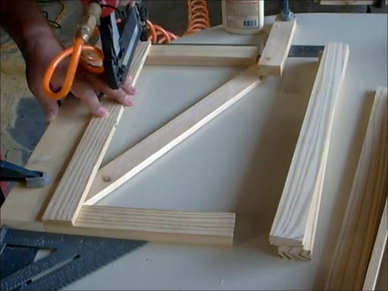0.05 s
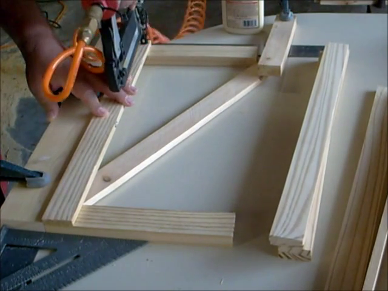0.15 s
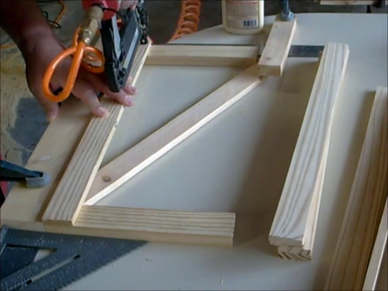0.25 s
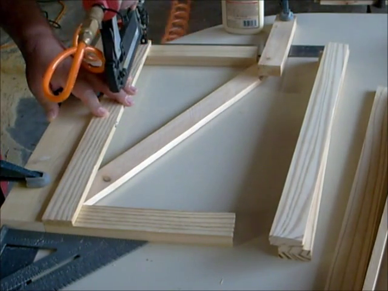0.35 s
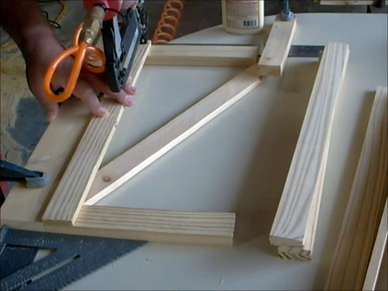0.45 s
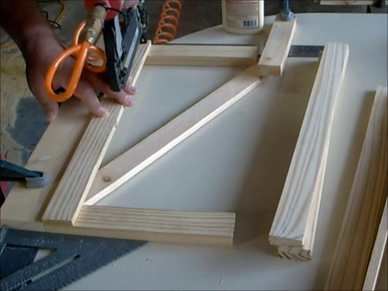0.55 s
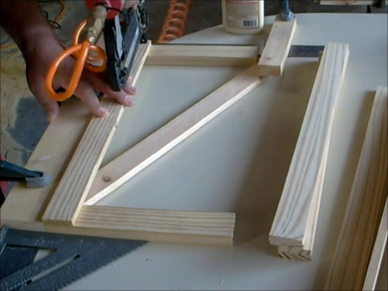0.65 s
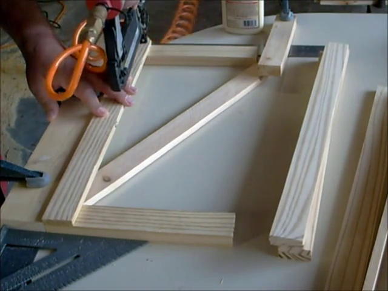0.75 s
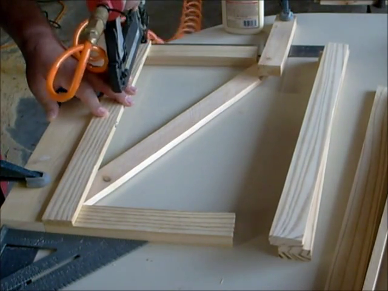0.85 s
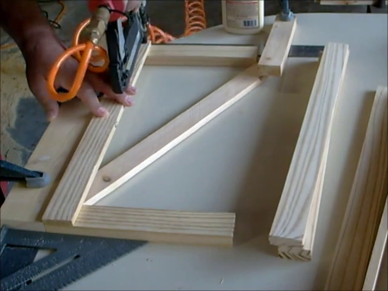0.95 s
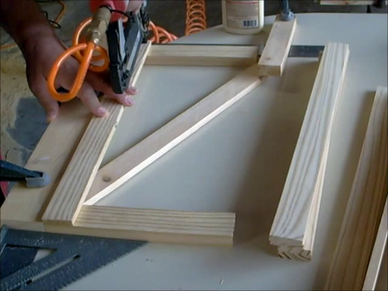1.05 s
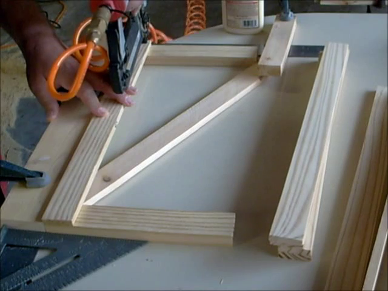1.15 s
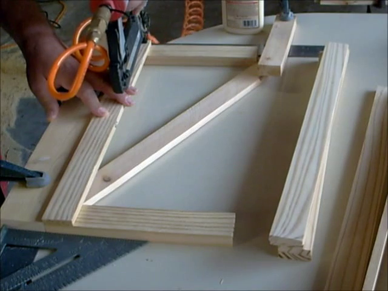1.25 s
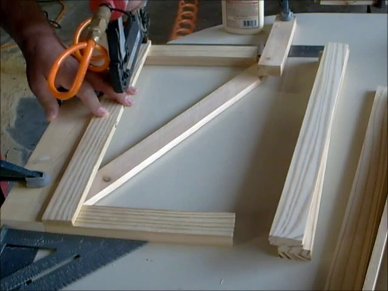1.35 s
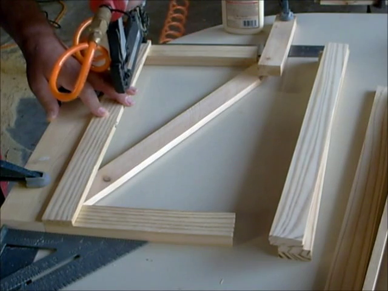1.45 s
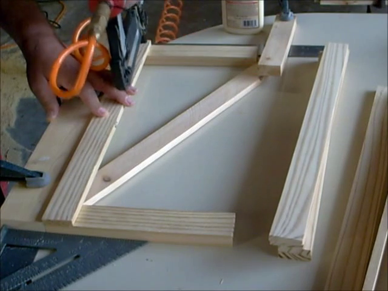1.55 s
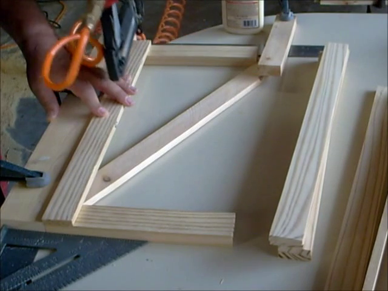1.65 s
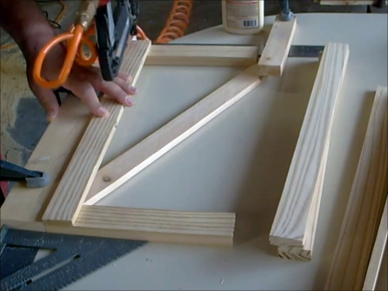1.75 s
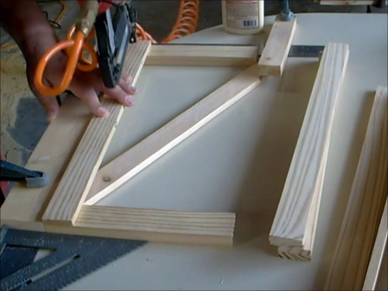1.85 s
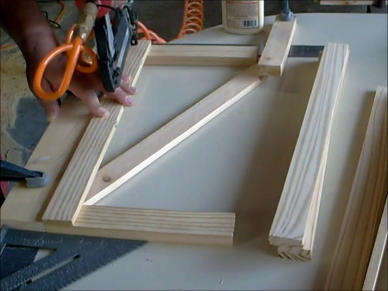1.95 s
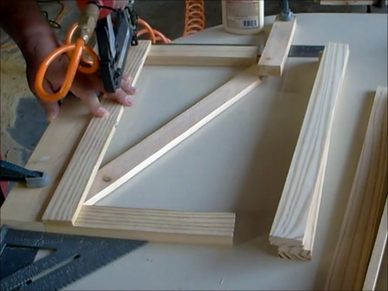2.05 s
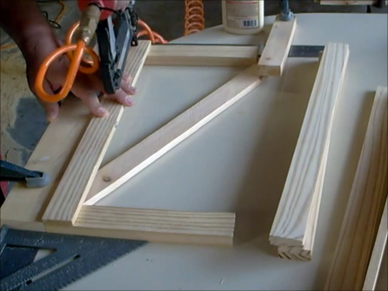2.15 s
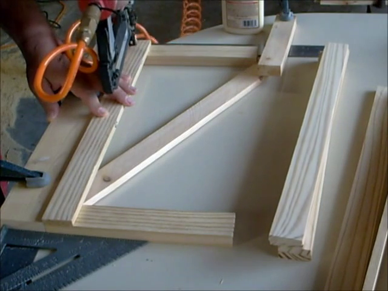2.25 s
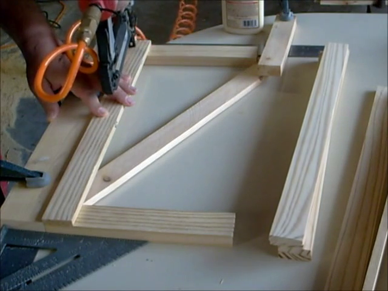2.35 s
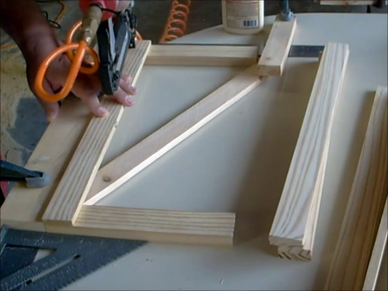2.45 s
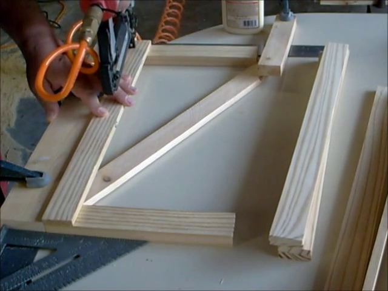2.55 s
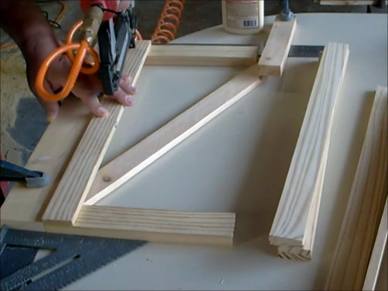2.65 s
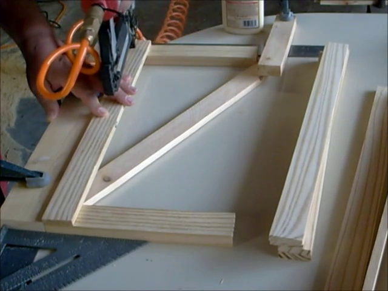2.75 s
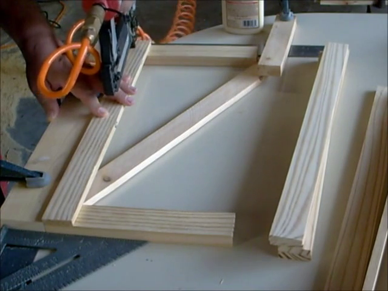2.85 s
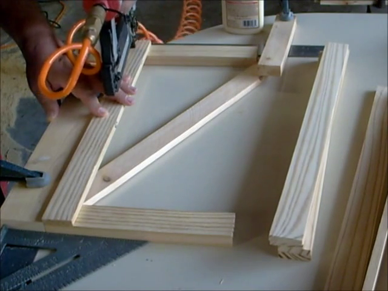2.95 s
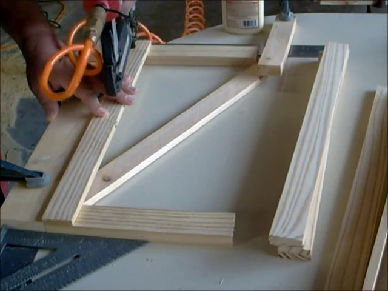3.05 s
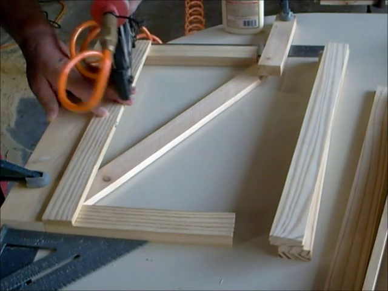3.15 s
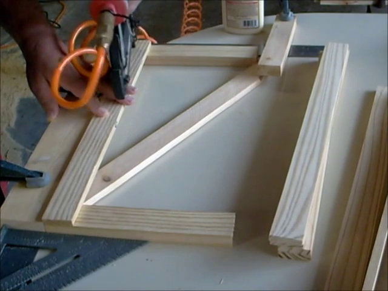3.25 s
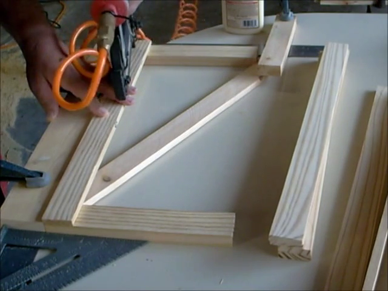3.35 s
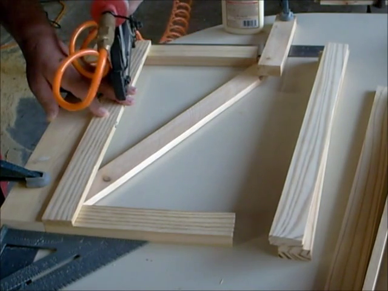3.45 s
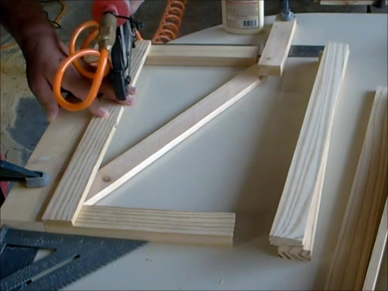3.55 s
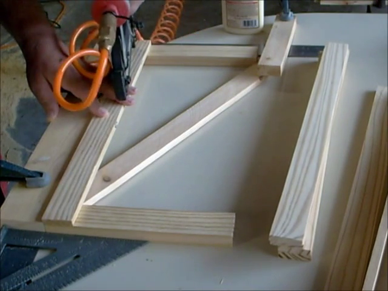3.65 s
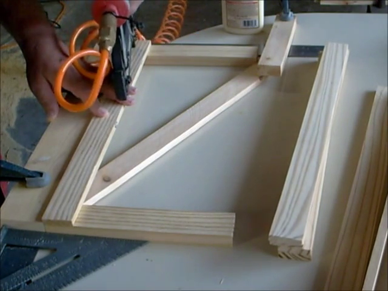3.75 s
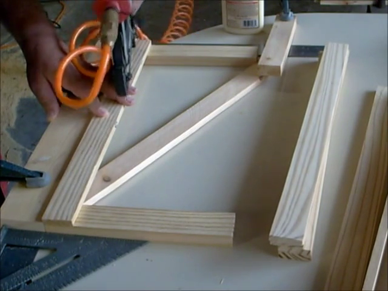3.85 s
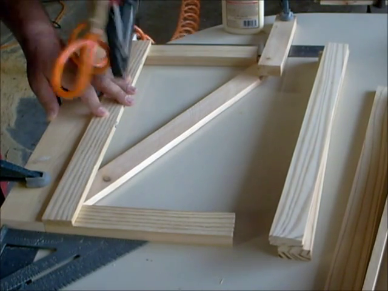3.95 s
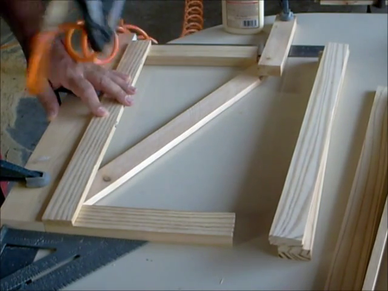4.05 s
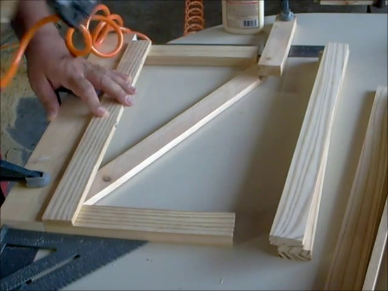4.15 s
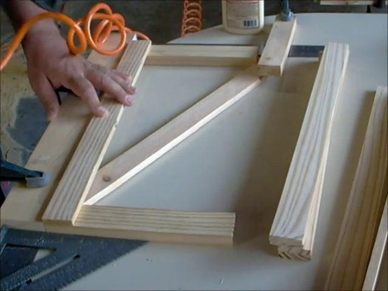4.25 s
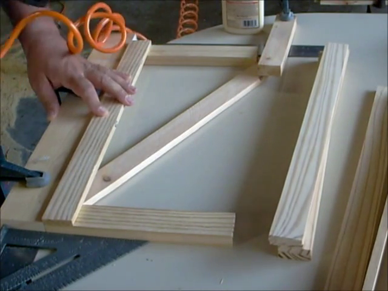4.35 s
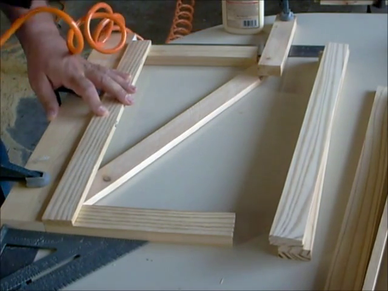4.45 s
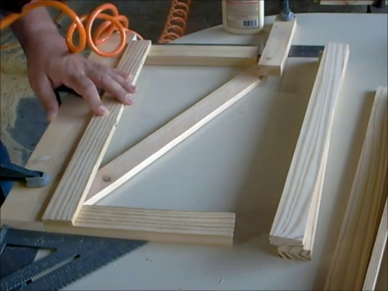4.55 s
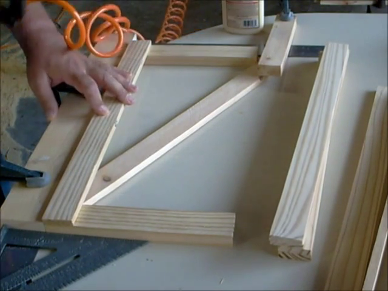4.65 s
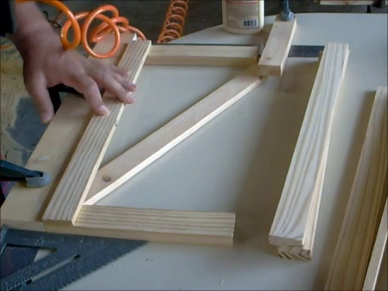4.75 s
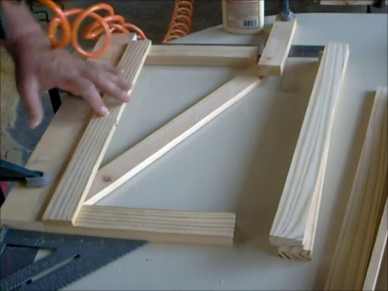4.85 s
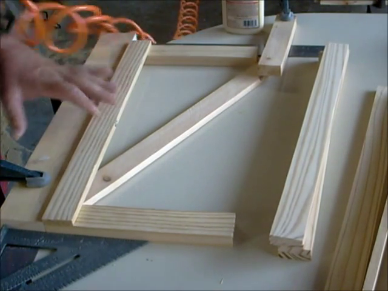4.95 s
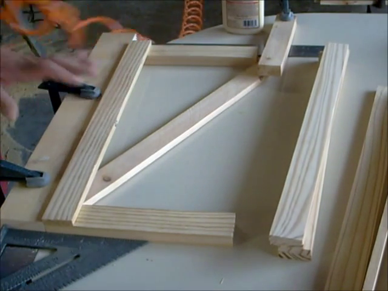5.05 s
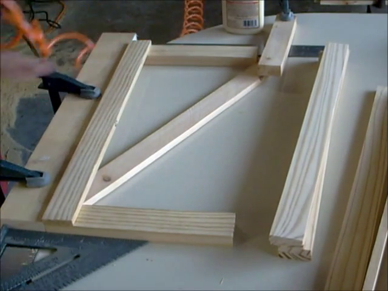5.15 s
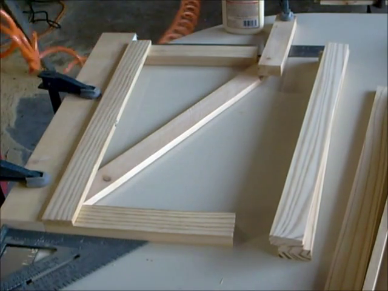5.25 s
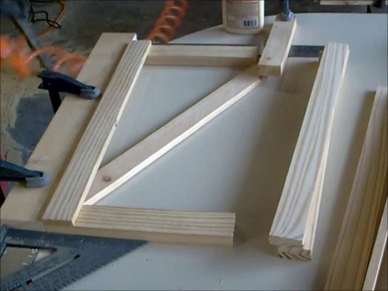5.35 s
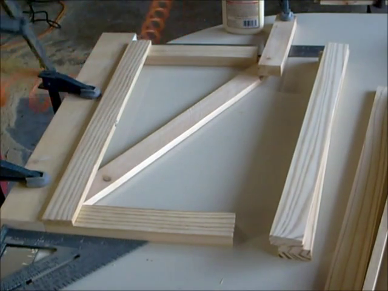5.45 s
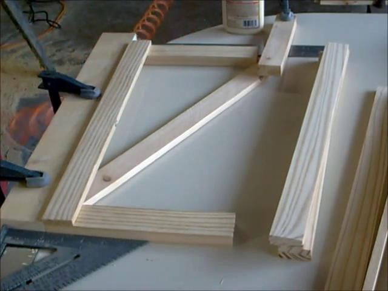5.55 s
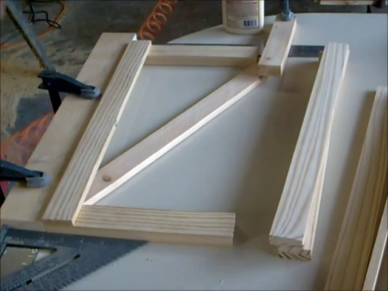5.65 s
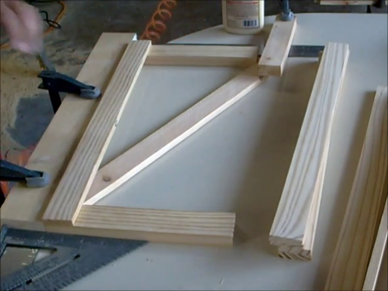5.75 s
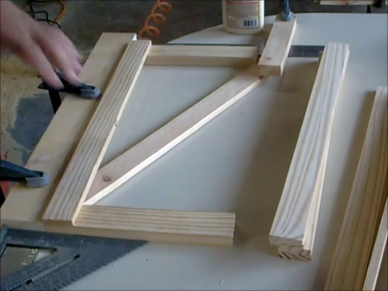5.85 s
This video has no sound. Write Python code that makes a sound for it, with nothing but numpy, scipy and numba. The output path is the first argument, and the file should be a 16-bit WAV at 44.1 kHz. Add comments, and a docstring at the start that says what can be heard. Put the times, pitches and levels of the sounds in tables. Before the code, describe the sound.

A small microphone near a bench picks up faint traffic and a few dry wooden clicks. Two separate air nailer shots burst out, each a brief hiss, hard bang, crackling distorted ring near three kilohertz, and air release with a second knock. Room echoes die away, then soft scraping and a tap follow as a vehicle passes far off.

```python
"""Air nailer in a workshop

Two brads go into wooden slats on a bench in a hard-walled room, near a small camera microphone.
Each shot: valve hiss, blow, exhaust puff, piston return, then band-by-band room echoes of shaped noise.
Taps (sine clicks, noise knocks), a grainy scrape and distant traffic (noise with drifting humps) surround them.
The microphone peaks near 3 kHz, its limiter holds the ringing level, and overloads fold over into clicks.
"""
import sys
import numpy as np
from scipy import signal
from scipy.fft import rfft, irfft
from scipy.io import wavfile
from scipy.ndimage import uniform_filter1d
from numba import njit

SR = 44100
rng = np.random.default_rng(int(sys.argv[2]) if len(sys.argv) > 2 else 0)


def dump(signal):
    """Clip the signal to [-1, 1] and save it as 16-bit WAV at the path in sys.argv[1]."""
    limited = np.clip(np.atleast_2d(signal).T, -1, 1)
    pcm = np.round(limited * 32767).astype(np.int16)
    wavfile.write(sys.argv[1], SR, pcm)


def makeup_ratio(level_db):
    """Linear amplitude ratio for a level in decibels (20 dB per factor of ten)."""
    decades = np.asarray(level_db, float) / 20
    return 10 ** decades


N = 260172
T = np.arange(N) / SR


def level(x, rms_db):
    """Scale to an rms level."""
    return x * makeup_ratio(rms_db) / np.sqrt(np.mean(x ** 2))


def colour(x, points):
    """Minimum-phase filter through (Hz, dB) points, from the folded cepstrum of the log gain."""
    hz, db = np.transpose(points)
    size = 4096
    bins_hz = np.fft.rfftfreq(size, 1 / SR)
    gain_db = np.interp(np.log(bins_hz + 1), np.log(hz), db)
    cepstrum = irfft(np.log(makeup_ratio(gain_db)))
    cepstrum[1:size // 2] *= 2
    cepstrum[size // 2 + 1:] = 0
    impulse = irfft(np.exp(rfft(cepstrum)))
    return signal.fftconvolve(x, impulse)[:len(x)]


def band(x, hz, width_hz):
    """Resonance, gain 1 at the centre."""
    return signal.lfilter(*signal.iirpeak(hz, hz / width_hz, fs=SR), x)


def burst(start_s, t60_s, rise_s=0.00035):
    """Envelope that rises exponentially at start_s and dies away by 60 dB in t60_s."""
    t = np.maximum(T - start_s, 0)
    return (1 - np.exp(-t / rise_s)) * np.exp(-np.log(1000) * t / t60_s)


# distant vehicle drawing near and leaving: time_s, level_db, lower_hump_hz
TRAFFIC_PATH = [(0, -56.5, 793.6), (.9, -55, 782), (2.3, -53.5, 771.6), (3.2, -51.5, 766),
                (4.3, -46, 725.5), (4.65, -45.5, 675), (4.9, -49, 672), (5.3, -50, 701.5), (5.9, -52, 713)]
# rumble spectrum: freq_hz, density_db (dB per Hz)
RUMBLE_SPECTRUM = [(30, -24), (100, -4.5), (250, 2), (500, 0), (1000, 3), (1600, -1.5), (2400, -8),
                   (4000, -39.5)]
# humps grow with the level; the treble follows only in part (growth: dB per dB above MIDDLE_DB)
MIDDLE_DB = -53.5
HUMP_DB, HUMP_GROWTH = -3.5, 0.73
TREBLE_DB, TREBLE_GROWTH = -61.5, 0.3


def traffic():
    """Broad rumble with two humps that drift together, and a fainter treble."""
    columns = np.transpose(TRAFFIC_PATH)
    _, level_db, hump_hz = (np.interp(T, columns[0], column) for column in columns)
    noise = rng.standard_normal((4, N))
    # narrow noise shifted up to the moving centres
    phase = 2 * np.pi * np.cumsum(hump_hz) / SR
    lower = level(signal.lfilter([1], [1, -0.99], noise[1]) * np.cos(phase), 0)
    upper = level(signal.lfilter([1], [1, -0.99], noise[3]) * np.cos(1.75 * phase), -6)
    swell_db = level_db - MIDDLE_DB
    humps = makeup_ratio(HUMP_DB + HUMP_GROWTH * swell_db) * (lower + upper)
    rumble = level(colour(noise[0], RUMBLE_SPECTRUM), 0)
    treble = level(band(noise[2], 2400, 1900), 0)
    return makeup_ratio(level_db) * (rumble + humps) + makeup_ratio(TREBLE_DB + TREBLE_GROWTH * swell_db) * treble


# tool nose and hose touching wood: start_s, level_db, click_db, knock_db, rustle_db (last three re level_db)
TAP_EVENTS = [(0.1714, -48, -4, -4, -22), (0.181, -29, -9, -8, -27), (0.1869, -36.5, 10.5, -6.5, -27),
              (0.1978, -34.5, -12, -12, -24), (0.223, -43, 1, -18, -22), (0.244, -39, -19, -30, -23),
              (0.453, -47, -13, -22, -22), (0.552, -43.5, 7, -18, -21), (0.559, -34, -6, -27, -22),
              (0.607, -42, -1.5, -21, -20), (0.9682, -40.5, -1.5, -6.5, -17), (0.9905, -30, -2.5, -16, -14),
              (2.4355, -42, -4, -11, -12), (4.4642, -35, -21, -24, 4.5)]
# hand and hose sliding over the bench: loudest_s, level_db, swell_db_per_s, fade_db_per_s
SCRAPE_STROKES = [(4.465, -42.5, 900, 120), (5.06, -57.5, 57.5, 59.5), (5.421, -34.5, 117.5, 80.5),
                  (5.72, -55.5, 113, 89.5), (5.891, -47.5, 1200, 60)]
RATTLE_T60_S = 0.035


def handling():
    """Taps click at 2.9 kHz, rattle and knock on wood; the scrape is noise with a grainy gain."""
    noise = rng.standard_normal((4, N))
    rattle = level(band(noise[0], 2200, 1400), 0)
    knock = level(band(noise[0], 1300, 300), 0)
    taps = np.zeros(N)
    for start_s, level_db, click_db, knock_db, rustle_db in TAP_EVENTS:
        click = burst(start_s, 0.015) * np.sin(2 * np.pi * 2900 * (T - start_s))
        shake = 0.47 * rattle + makeup_ratio(knock_db) * knock + makeup_ratio(rustle_db) * noise[3]
        shake *= burst(start_s, RATTLE_T60_S, rise_s=0.0003)
        taps += makeup_ratio(level_db) * (makeup_ratio(click_db) * click + shake)
    pressure = np.zeros(N)
    for loudest_s, level_db, swell_db_per_s, fade_db_per_s in SCRAPE_STROKES:
        before_db = swell_db_per_s * (loudest_s - T)
        after_db = fade_db_per_s * (T - loudest_s)
        pressure += makeup_ratio(level_db - np.where(T < loudest_s, before_db, after_db))
    grain = makeup_ratio(2.5 * level(uniform_filter1d(noise[1], size=60), 0))
    slide = colour(noise[2] * grain, [(400, -21), (1500, -6), (4000, -2.5), (9000, -13.5)])
    return taps + pressure * level(slide, 0)


# driver strokes: valve_s, blow_s, blow_db, slat_hz, ring_db
SHOT_EVENTS = [(1.4185, 1.4432, 10.5, 1000, -8), (3.6675, 3.6892, 11.5, 2150, 1)]
# piston releases: exhaust_s, piston_home_s, puff_db, vent_db, return_knock_db
RELEASE_EVENTS = [(1.546, 1.571, -3, -6, 10), (3.806, 3.8255, 5, -9, 12.5)]
# bench resonances excited with the slat: freq_hz, width_hz, level_re_slat_db
BENCH_MODES = [(500, 300, -4), (999, 630, -2)]
# valve air spectrum: freq_hz, density_db (dB per Hz)
AIR_SPECTRUM = [(100, -34.5), (400, -15), (1500, -6.5), (4000, 11), (10000, 3.5)]
# blow and return-knock spectrum: freq_hz, density_db (dB per Hz)
BLOW_SPECTRUM = [(40, -0.5), (200, 3.5), (500, -3.5), (1200, 9.5), (2500, 6), (5000, -7.5), (10000, -11)]
# late exhaust spectrum: freq_hz, density_db (dB per Hz)
VENT_SPECTRUM = [(150, -12), (500, -18.5), (1500, 7), (3200, 1.5), (6000, -6.5), (10000, -6)]
TRIGGER_LEAD_S, TRIGGER_DB, VALVE_DB = 0.0063, -35.5, -11.5
BENCH_T60_S, SLAT_T60_S = 0.23, 0.32


def nailer():
    """Valve hiss into the blow, the driver's crack into the slat, exhaust air, the piston's return knock."""
    air = level(colour(rng.standard_normal(N), AIR_SPECTRUM), 0)
    crack = level(colour(rng.standard_normal(N), BLOW_SPECTRUM), 0)
    jet = level(colour(air, [(1500, -19.5), (3200, -16), (6000, -2), (10000, 3)]), 0)
    wood = rng.standard_normal(N)
    bench = sum(level(band(wood, hz, width_hz), db) for hz, width_hz, db in BENCH_MODES)
    vent = level(colour(rng.standard_normal(N), VENT_SPECTRUM), 0)
    out = np.zeros(N)
    for valve_s, blow_s, blow_db, slat_hz, ring_db in SHOT_EVENTS:
        out += makeup_ratio(TRIGGER_DB) * burst(valve_s - TRIGGER_LEAD_S, 0.0037) * air
        out += makeup_ratio(VALVE_DB) * burst(valve_s, 0.13, rise_s=0.0015) * air
        # the driver's first push is a short low thump
        thump = -np.sin(2 * np.pi * 650 * (T - blow_s)) * burst(blow_s, 0.008, rise_s=0.001)
        out += makeup_ratio(blow_db + 3) * thump
        out += makeup_ratio(blow_db) * burst(blow_s + 0.00083, 0.02) * crack
        out += makeup_ratio(ring_db) * burst(blow_s + 0.01, BENCH_T60_S, rise_s=0.005) * bench
        slat = level(band(band(wood, slat_hz, 800), slat_hz, 800), 0)
        out += makeup_ratio(ring_db) * burst(blow_s + 0.012, SLAT_T60_S, rise_s=0.004) * slat
    for exhaust_s, piston_home_s, puff_db, vent_db, return_knock_db in RELEASE_EVENTS:
        # bright until the piston is home, with a lower, longer vent
        out += makeup_ratio(puff_db) * burst(exhaust_s, 0.25, rise_s=0.005) * (T < piston_home_s) * jet
        out += makeup_ratio(vent_db) * burst(exhaust_s, 0.42, rise_s=0.011) * vent
        out += makeup_ratio(return_knock_db) * burst(piston_home_s, 0.0056) * crack
    return out


# room decay bands: freq_hz, t60_s, level_db
ROOM_BANDS = [(121.7, .35, -13), (250, 0.69, -3.5), (520, 0.47, 2), (930, .75, -6), (1601, 0.73, -7.5),
              (2100, 0.38, 2.5), (3460, 0.59, 1.5), (5000, 0.35, 9.5), (9000, 0.17, 8)]


def workshop(x):
    """Dense echoes that start after the first wall and fade band by band, unit energy overall."""
    t = T[:int(1.4 * SR)]
    echoes = np.zeros(len(t))
    for hz, t60_s, level_db in ROOM_BANDS:
        noise = band(rng.standard_normal(len(t)), hz, 0.45 * hz)
        echoes += makeup_ratio(level_db) * noise * np.exp(-np.log(1000) * t / t60_s)
    first_wall_s, build_s = 0.0115, 0.0057
    echoes *= np.clip((t - first_wall_s) / build_s, 0, 1)
    return signal.fftconvolve(x, echoes)[:N] / np.sqrt(np.sum(echoes ** 2))


@njit
def follow(x, attack, release):
    """Peak follower, quick up and slower down (coefficients per sample)."""
    env, e = np.empty(len(x)), 1e-9
    for i in range(len(x)):
        e += (abs(x[i]) - e) * (attack if abs(x[i]) > e else release)
        env[i] = e
    return env


# overload swings after every blow: delay_s, level_db, half_width_ms
BLOW_OVERLOADS = [(.0022, 2.2, 1.2), (.0052, 1.5, 2.1)]
# overload swings after every return knock: delay_s, level_db, half_width_ms
RETURN_OVERLOADS = [(.0017, 1.7, 2.2)]
# ringing crackles into overload: time_s, level_db
CRACKLE_EVENTS = [(1.4586, .6), (1.4875, 1.3), (1.4985, .5), (1.5155, 1.7), (1.5222, 1.6), (1.534, 1.8),
                  (1.5585, 1.3), (1.5847, 1.4), (1.5918, 1.7), (1.5995, 1.7), (1.602, 1.3), (1.6193, 1.3),
                  (1.6462, 1.3), (3.7102, 1), (3.7365, 1.5), (3.770, .9), (3.779, 1), (3.8352, 1.3),
                  (3.845, 1.7), (3.8632, 1.3), (3.8757, 1.6), (3.888, 1.1), (3.8955, 1.6), (3.9053, 1.2)]
CRACKLE_HALF_WIDTH_MS, SWING_ROUGHNESS = 0.7, 0.25


def surge(x):
    """Short swings at the microphone's own pitch displace the ringing; those after blows and knocks are ragged."""
    swings = [(s, db, CRACKLE_HALF_WIDTH_MS, 0) for s, db in CRACKLE_EVENTS]
    for _, blow_s, *_ in SHOT_EVENTS:
        swings += [(blow_s + delay_s, db, ms, SWING_ROUGHNESS) for delay_s, db, ms in BLOW_OVERLOADS]
    for _, home_s, *_ in RELEASE_EVENTS:
        swings += [(home_s + delay_s, db, ms, SWING_ROUGHNESS) for delay_s, db, ms in RETURN_OVERLOADS]
    ragged = level(band(rng.standard_normal(N), 1500, 2500), 0)
    for centre_s, level_db, half_width_ms, roughness in swings:
        share = np.exp(-((T - centre_s) * 1000 / half_width_ms) ** 2)
        swing = np.cos(2 * np.pi * 3150 * (T - centre_s)) + roughness * ragged
        x = x * (1 - 0.95 * share) - makeup_ratio(level_db) * share * swing
    return x


def scene():
    """Tool and hands with their echoes, over the traffic."""
    shots, hands = nailer(), handling()
    # the tool points away, so the walls return more of it than comes direct
    to_walls = makeup_ratio(3) * shots + makeup_ratio(-13) * hands
    return (shots + hands + workshop(to_walls) + traffic())[None]


def band_limit(x):
    """A steep low-pass at the top of the band."""
    return signal.sosfilt(signal.butter(12, 10780, fs=SR, output="sos"), x)


# microphone response: freq_hz, gain_db
MIC_RESPONSE = [(40, -4), (200, -6), (2000, -2.5), (2600, 1), (2950, 8.5), (3170, 13), (3350, 9),
                (3650, 2.5), (4200, -2), (5000, -9.5), (7500, -17.5), (10500, -24.5)]
# input hiss spectrum: freq_hz, density_db (dB per Hz)
HISS_SPECTRUM = [(25, 9), (60, 19), (120, 21.5), (250, 3.5), (3000, -2.5), (10000, 0.5)]
LIMIT_DB, ATTACK_S, RELEASE_S = -4.0, 0.0014, 0.03
HISS_DB, TOP_HZ = -66.5, 12200


def record(dry):
    """Microphone peak, limiter, converter that clips upward swings and folds downward ones, hiss, top cut."""
    x = colour(dry[0], MIC_RESPONSE)
    env = follow(x, 1 / (ATTACK_S * SR), 1 / (RELEASE_S * SR))
    x = x * np.minimum(1, makeup_ratio(LIMIT_DB) / env)
    # soft limit on peaks that slip past
    x = surge(x / (1 + np.abs(x) ** 8) ** (1 / 8))
    # a trough beyond full scale springs back up steeply
    x = np.where(x < -1, -1 + 11 * (-1 - x), x)
    hiss = level(colour(rng.standard_normal(N), HISS_SPECTRUM), HISS_DB)
    x = np.minimum(x, 1.6) + hiss
    x = signal.sosfilt(signal.cheby2(6, 19, TOP_HZ, fs=SR, output="sos"), x)
    x = np.clip(0.95 * x, -1, 1)
    return band_limit(x[None])


dry = scene()
out = record(dry)
dump(out)
```